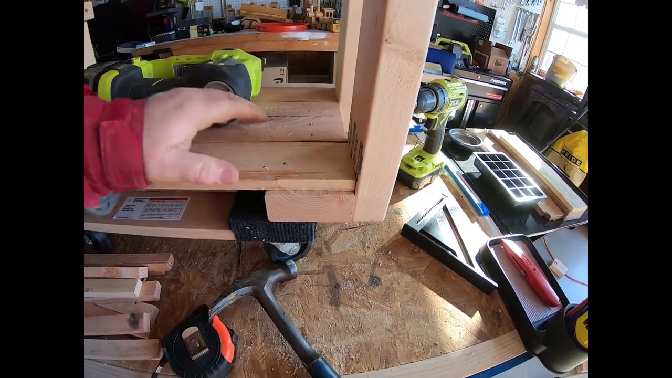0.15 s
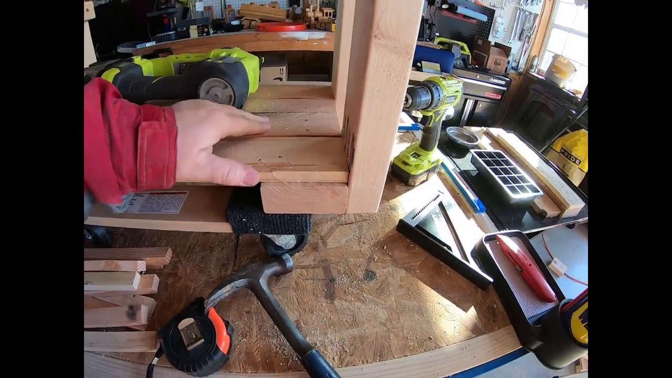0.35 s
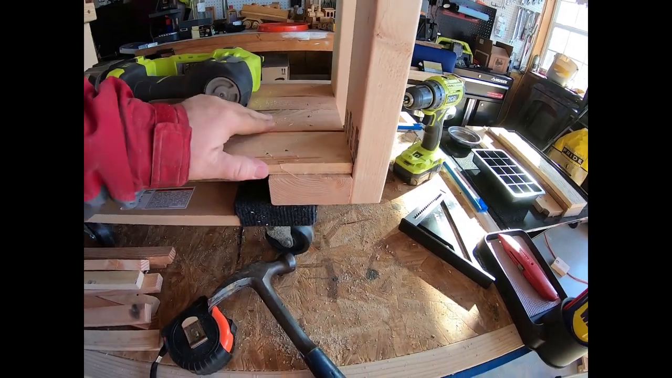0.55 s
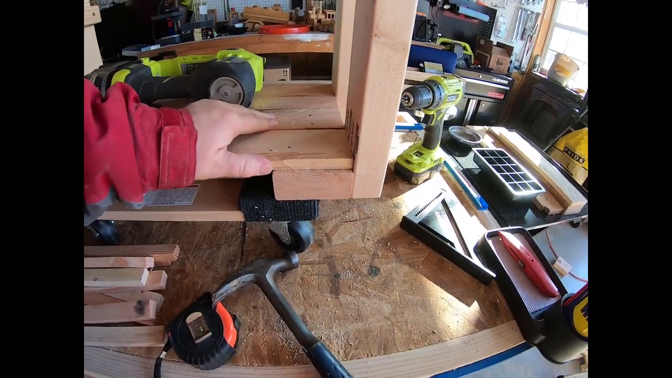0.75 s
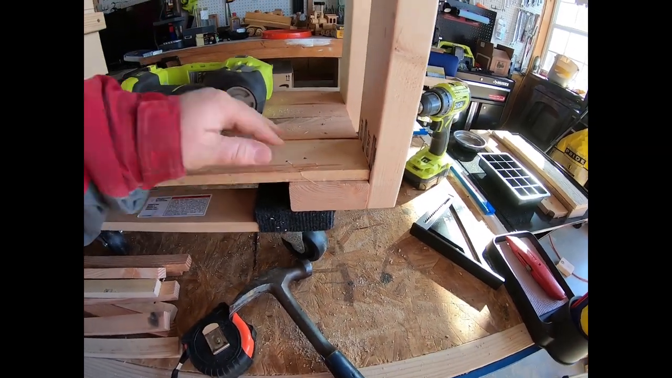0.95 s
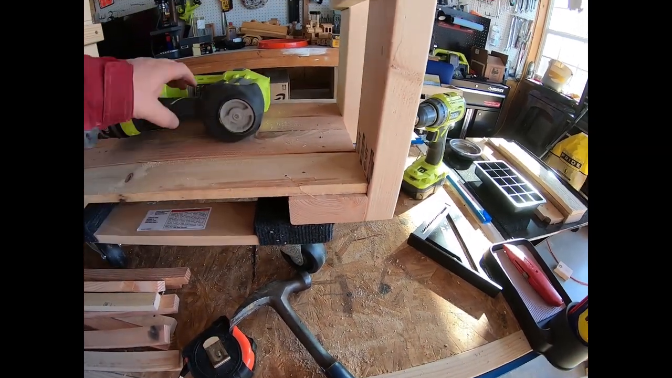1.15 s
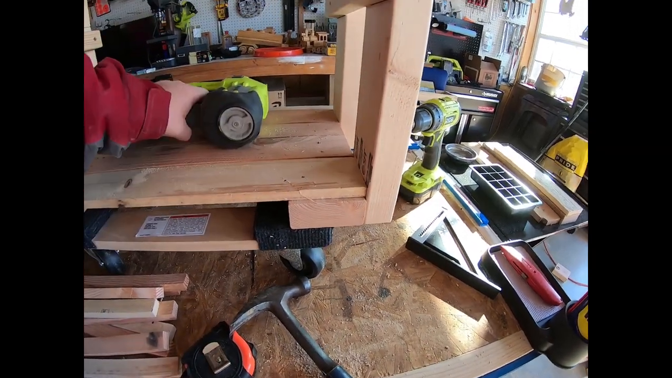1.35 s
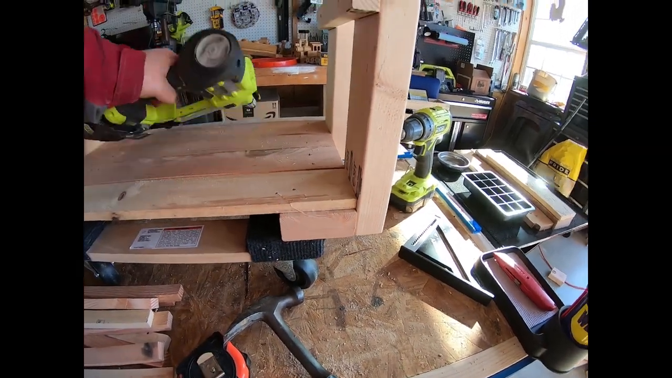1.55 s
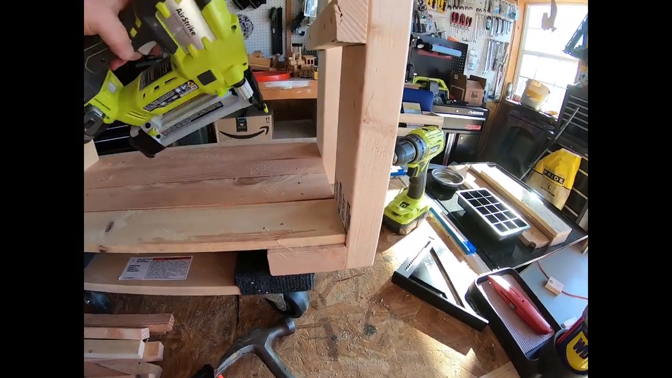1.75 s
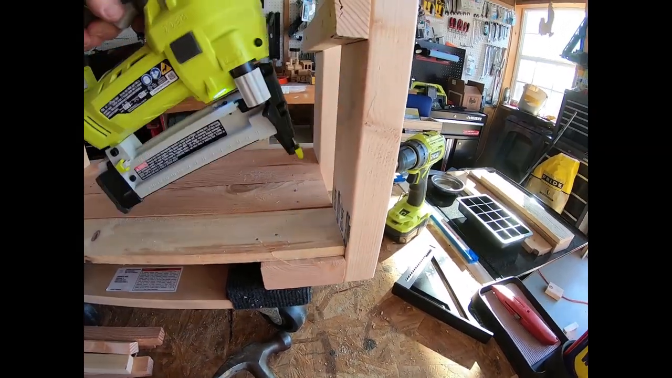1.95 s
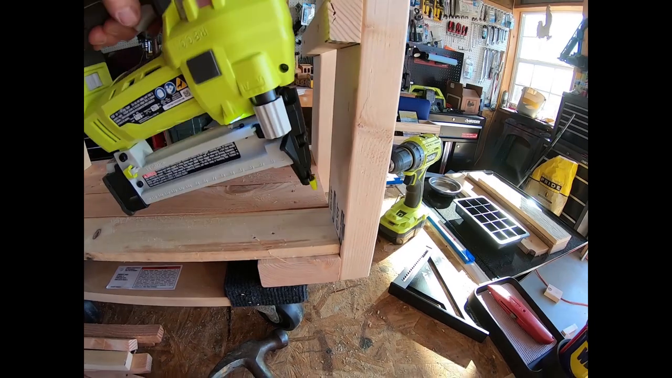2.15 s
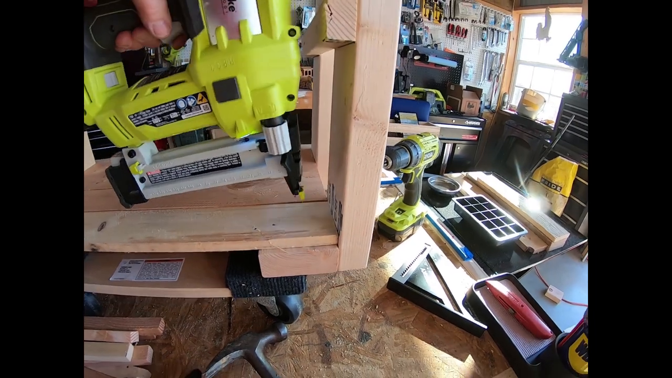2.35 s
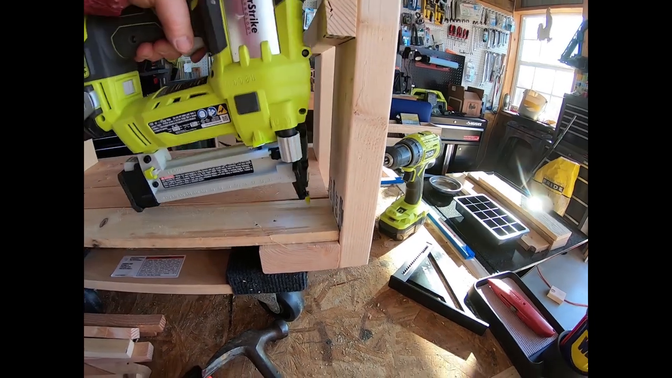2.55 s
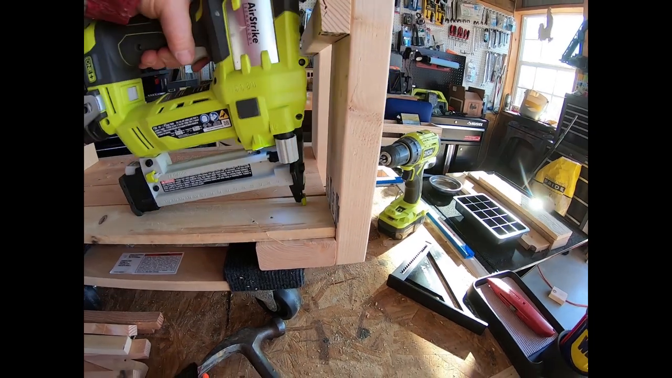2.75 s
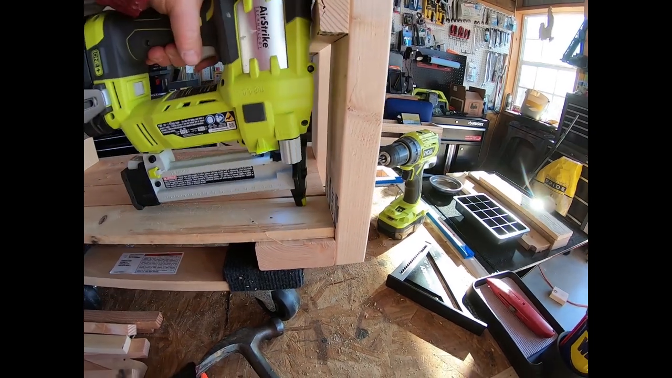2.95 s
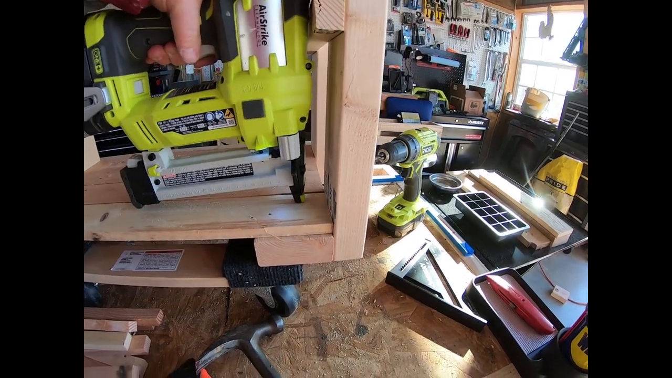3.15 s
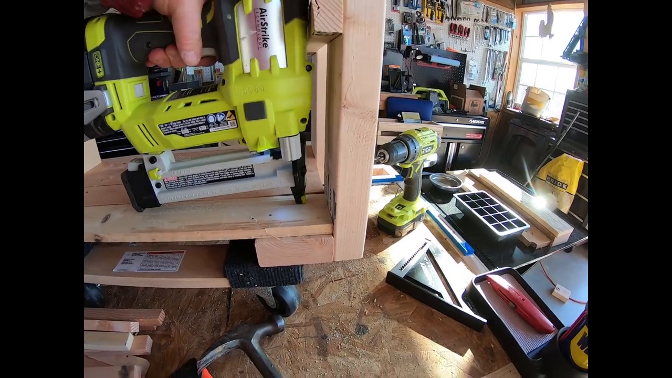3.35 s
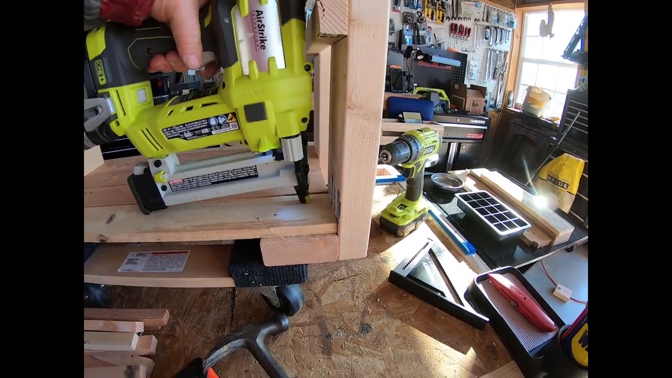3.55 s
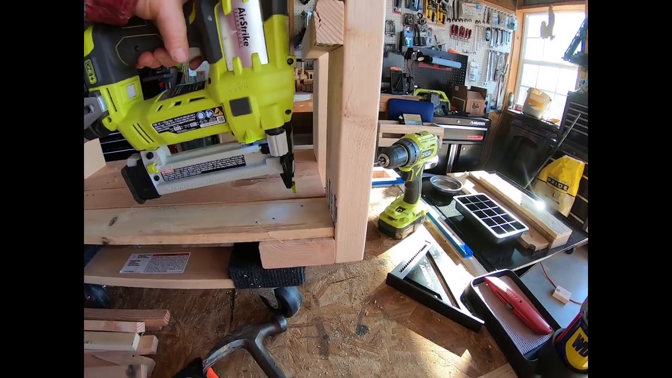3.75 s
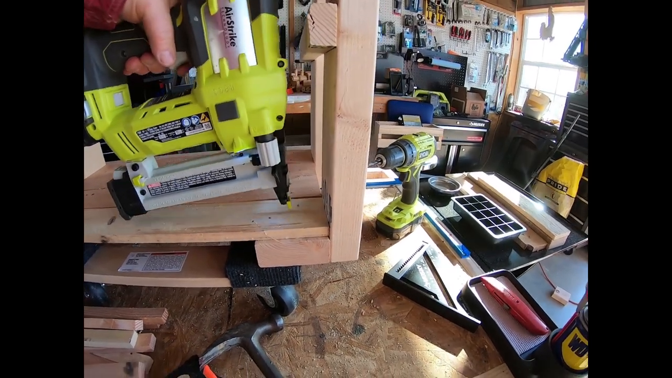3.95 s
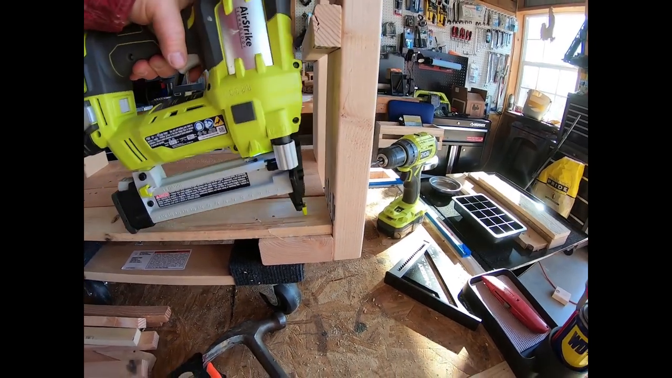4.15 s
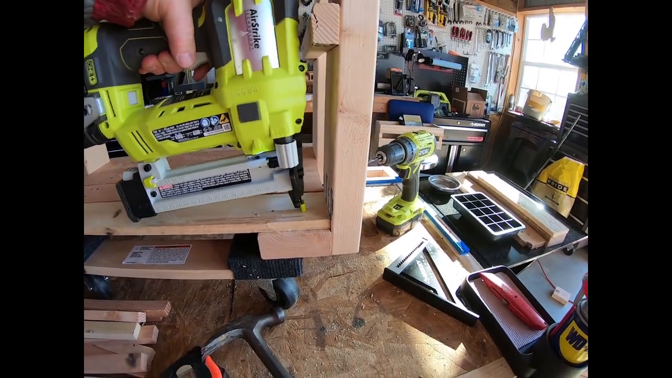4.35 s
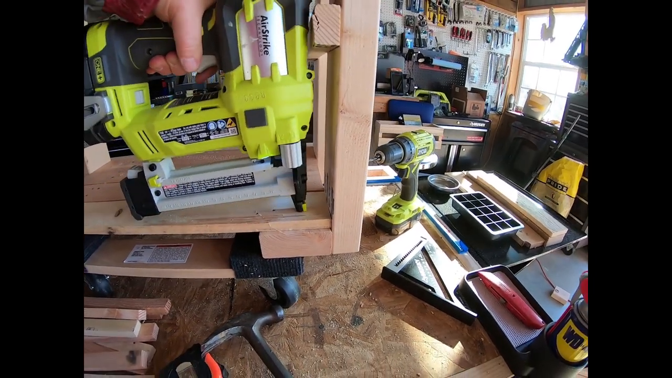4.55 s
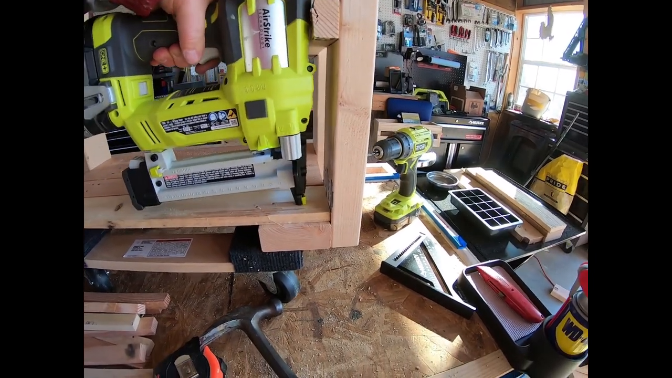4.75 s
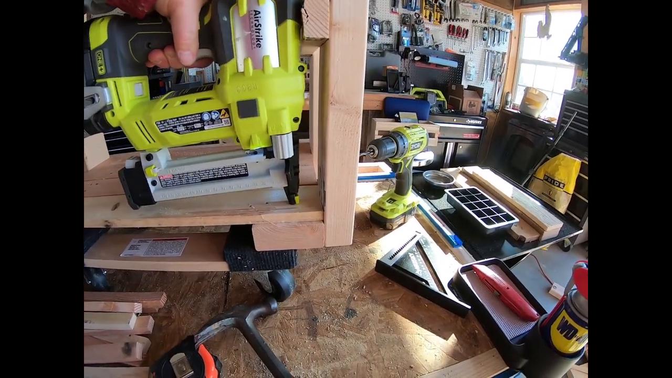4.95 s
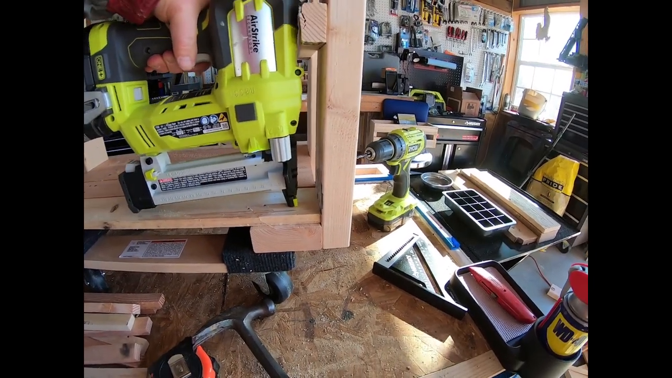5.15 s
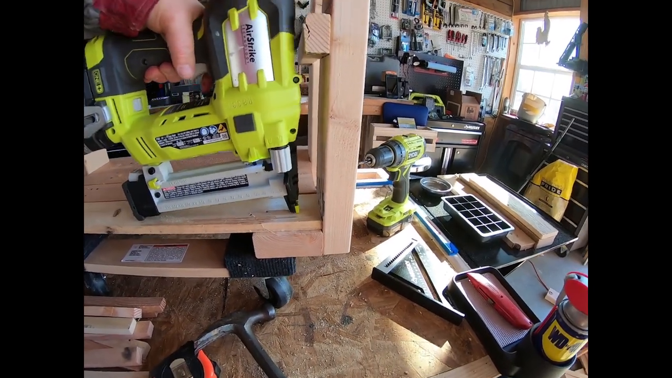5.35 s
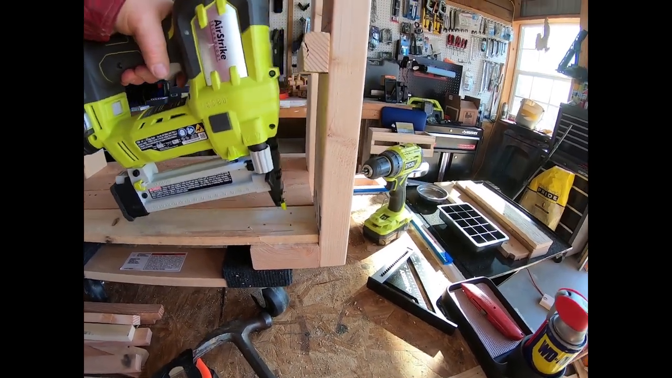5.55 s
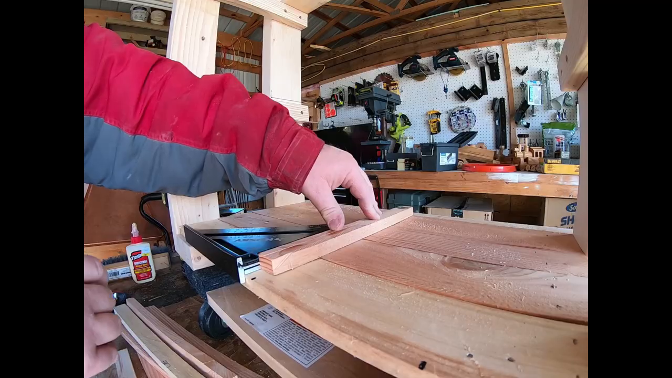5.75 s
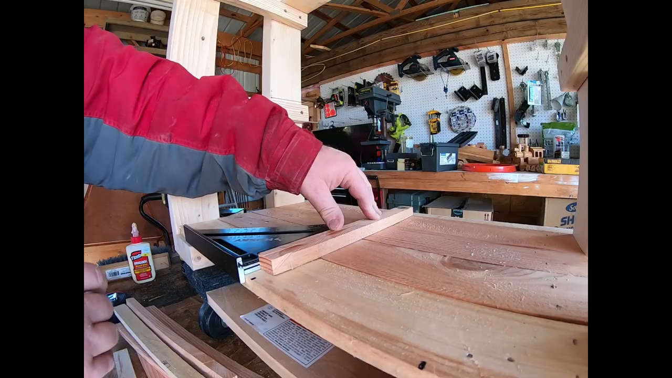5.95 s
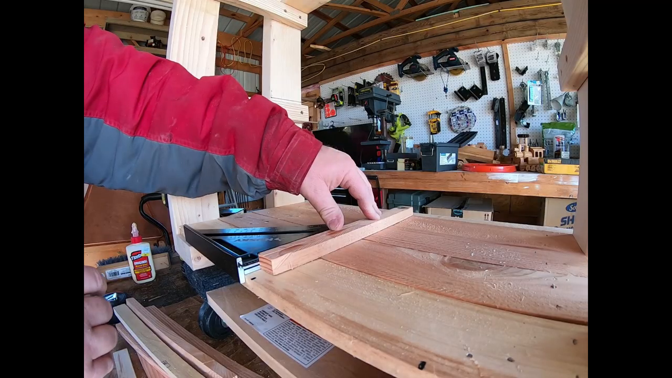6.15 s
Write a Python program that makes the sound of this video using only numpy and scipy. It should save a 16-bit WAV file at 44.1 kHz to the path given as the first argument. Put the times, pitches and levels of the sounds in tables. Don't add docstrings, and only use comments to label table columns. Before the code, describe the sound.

Close stereo pickup in a small workshop. Fingers tap and sleeves rub on softwood, then a tool clatters off a shelf. Its nose touches and is pressed onto the board with a deep knock. The trigger clicks, a geared motor whines up, sags and fires a hard crack with a woody boom; gears spin down to a latch click. It is set down again and fires once more, then a brief silence and faint room drone.

```python
import sys
import numpy as np
from scipy import signal
from scipy.fft import rfft, irfft, next_fast_len
from scipy.io import wavfile
from scipy.ndimage import uniform_filter1d

SR = 44100
rng = np.random.default_rng(int(sys.argv[2]) if len(sys.argv) > 2 else 0)


def to_wav(s):
    ch = np.atleast_2d(s).T
    pcm = np.round(np.clip(ch, -1, 1) * 32767)
    wavfile.write(sys.argv[1], SR, pcm.astype(np.int16))


def boost(x):
    u = np.asarray(x, float) / 20
    return 10 ** u


N = 277389

# (time [s], peak [dB]).
TRIGGER = ([(1700, -5.5, .008), (2930, -0.5, .006), (5800, -3, 0.0036), (6900, -2.5, 0.006),
            (8700, -7.5, 0.005)], 2.8, [(3.085, -21.5), (4.93, -24)])
DRIVER = ([(1640, -3, 0.0036), (2500, -3, 0.0048), (3580, 3.5, 0.0052), (5000, -5.5, 0.0028),
           (6540, -5.5, 0.0031), (9560, -6.5, 0.0028)], 3.2, [(3.3248, -1.1), (5.1645, -0.89)])
NAIL_SEAT = ([(950, -7, 0.0015), (1500, 0.5, 0.0023), (2600, 7, 0.0011), (4100, -3, .002)],
              3.7, [(3.329, -6.5), (5.1688, -3)])
REBOUND = ([(1987, 2.5, 0.023), (2900, -2.5, 0.011), (3422, -0.5, 0.019), (4080, -8, 0.011),
            (4735, 7.5, 0.0036), (5575, -16, 0.0044), (8160, -3.5, 0.0075)], 1.9, [(3.4252, -5),
            (5.2638, -5.5)])
LATCH = ([(1210, -13, 0.1), (2230, -6, 0.045), (2500, 3, 0.013), (3500, 2, 0.0042), (5480, -7, 0.0084),
          (4280, -6, 0.0084)], 2.45, [(3.68, -23), (5.479, -25)])
CRACK_LOW_HZ = [1500, 1100, 900, 1844, 1800]


def gun():
    out = np.zeros(N)
    parts = (TRIGGER, DRIVER, NAIL_SEAT, REBOUND, LATCH)
    for (modes, burst_ms, shots), low_hz in zip(parts, CRACK_LOW_HZ):
        for start_s, peak_db in shots:
            chatter, fall, t = burst(burst_ms, 1.6, rise_s=0.00025)
            strike = chatter * fall
            hit = np.zeros(len(t))
            for hz, mode_db, t60_s in modes:
                hit += boost(mode_db) * peak_one(ring(strike, hz, t60_s))
            hit += .9 * band(strike, low_hz, 6500)
            hit += .15 * band(strike, 6500, 14000)
            add_at(out, start_s, boost(peak_db) * peak_one(hit))
    return out


# (time [s], level [dB], pitch [Hz])
CHIP_TICK = (5.918, -56, 8300)


def blast():
    snap_db, shove_db, shove_hz = -16, -22.5, 39.8
    snap, shove = np.zeros((2, N))
    for shot_s, _ in DRIVER[2]:
        chatter, fall, t = burst(1.2, 2, rise_s=.0002)
        add_at(snap, shot_s, boost(snap_db) * band(chatter * fall, 9500, 19000) / 3)
        puff = np.sin(2 * np.pi * shove_hz * t) * np.exp(-t / 0.0088)
        add_at(shove, shot_s, boost(shove_db) * puff)
    tick_s, tick_db, tick_hz = CHIP_TICK
    click = np.zeros(N)
    click[round(tick_s * SR)] = boost(tick_db)
    left_right_db = [[3], [-3]]
    return snap + ring(click, tick_hz, 0.0069), shove * boost(left_right_db)


# (time [s], peak [dB], second group [dB], upper group [dB], push length [ms])
THUMPS = [(.002, -32, -2, -3, 2.8), (.06, -35, -1, -2.5, 5.3), (0.592, -48.5, 3.5, 8.5, 2.9),
          (0.627, -41, 16, -5, 4), (1.5559, -28.5, 6, 6, 2.7), (1.579, -33.5, 10, 13, 6.4),
          (1.598, -17.5, -22, -7, 4.5), (2.727, -36.5, -3.5, 1, 2.8), (2.81, -39, 6.5, -3, 6.6),
          (2.899, -10, -12, -23.5, 10.5), (3.324, -22, -5, -12, 3), (3.326, -10.5, -2.5, -22, 8),
          (3.381, -16.5, -21, -13, 8.7), (3.425, -22.5, -7, -5.5, 3), (3.511, -36.5, -2.5, -28, 6),
          (0.333, -55.5, 12, -13, 4), (0.351, -54.5, 8.5, -4, 5.6), (0.679, -40, -23, -24, 2),
          (3.615, -42, 1.5, -6, 4), (4.325, -44, -4.5, -10, 3.5), (4.514, -11.5, -12, -26, 8.1),
          (5.1624, -23, -4, -23, 3), (5.165, -12, -4.5, -10.5, 5.65), (5.221, -27.5, 0, -4, 19),
          (5.263, -17.5, -4, -2.5, 7.2), (5.429, -43.5, 1, -13, 2.9)]
# (pitch [Hz], level [dB], time to fall 60 dB [s])
BOARDS = [
    [(93, -24.5, 0.93), (130, 3.5, 0.33), (151, -11.5, .12), (179.3, -12, 0.38)],
    [(100, -1, 0.09), (251.4, -7.5, 0.49), (280, 1, 0.2), (305, -7, 0.23)],
    [(336, 7, 0.042), (401.6, -4, 0.096), (472, -11, 0.059), (650, -8, 0.072), (740, -6, 0.018),
     (860, -9.5, 0.0056)],
]


def boards():
    out = np.zeros(N)
    for k, group in enumerate(BOARDS):
        push = np.zeros(N)
        for start_s, peak_db, second_db, upper_db, push_ms in THUMPS:
            group_db = [2.0, second_db, upper_db][k]
            length_ms = np.clip(push_ms, 1, 8) / (k + 1)
            shape = np.hanning(round(length_ms * SR / 1000) + 2)
            add_at(push, start_s, -boost(peak_db + group_db) * shape / shape.sum())
        for hz, mode_db, t60_s in group:
            out += boost(mode_db) * ring(push, hz, t60_s)
    return out


# (time [s], gear mesh pitch [Hz])
SPEED = [
    [(3.113, 1150), (3.135, 2115), (3.155, 2620), (3.19, 3030), (3.225, 3190), (3.245, 3060), (3.275, 2600),
     (3.3, 1910), (3.324, 1640)],
    [(4.953, 1200), (4.965, 1800), (4.985, 2420), (5.02, 3000), (5.055, 3260), (5.08, 3140), (5.11, 2750),
     (5.14, 1970), (5.164, 1700)],
]
# (multiple of mesh pitch, top level [dB], load at the top [0-1], spread of load, floor [dB], line width [Hz])
GEAR_TONES = [(1, -28, .75, .6, -36, 60.0), (2, -33.5, .88, .45, -46, 170.0), (3, -36, .95, .2, -50, 140.0),
              (4, -43, .82, .07, -66, 120.0), (1.31, -31.5, .42, .22, -45, 50.0),
              (.86, -31, .4, .2, -42, 90.0), (1.07, -33, .38, .12, -44, 90.0),
              (1.2, -38, .35, .2, -50, 150.0), (.55, -32, .75, .35, -44, 60.0),
              (.69, -35, .58, .1, -48, 100.0), (1.65, -41, .4, .25, -50, 150.0),
              (.105, -32, .31, .05, -43, 15.0)]
# (pitch [Hz], level [dB])
TOOTH_COLOUR = [(120, -49.5), (200, -8), (334, -12), (456, -22), (821, -12.5), (1160, -14.5), (1680, -10),
                (3310, -7.5), (4520, -5), (5900, -5), (7200, -11), (10200, -17), (10900, -33.5),
                (14800, -36.5), (15600, -68)]


def motor():
    mesh_hz, = in_time(SPEED, silent=0)
    load, = in_time([[(rows[0][0], 0), (rows[-1][0], 1)] for rows in SPEED], silent=0)
    take_up, let_go = .035, .04
    running = np.clip(load / take_up, 0, 1) * np.clip(.35 + (1 - load) / let_go, 0, 1)
    turn = 2 * np.pi * np.cumsum(uniform_filter1d(mesh_hz, size=300)) / SR
    throb = 1 + .3 * np.sin(GEAR_TONES[-1][0] * turn)

    tones = np.zeros(N)
    on = mesh_hz > 0
    for multiple, top_db, at_load, spread, floor_db, width_hz in GEAR_TONES:
        swell = np.exp(-((load[on] - at_load) / spread) ** 2)
        tone_db = floor_db + (top_db - floor_db) * swell
        level = boost(tone_db + 3 + 3.5 * drift(width_hz)[on])
        tones[on] += level * np.sin(multiple * turn[on] + 1.0 * drift(width_hz)[on])
    tones = band(running * throb * tones, 110, 13000)

    halves = np.split(mesh_hz, [2 * N // 3])
    fastest_hz = np.concatenate([np.maximum.accumulate(half) for half in halves])
    teeth_at_hz, db_per_octave, sag_loss_db = 3100, 7.5, 2
    noise_db = -17 + db_per_octave * np.log2((fastest_hz + 1) / teeth_at_hz)
    noise_db -= sag_loss_db * np.log2((fastest_hz + 1) / (mesh_hz + 1))
    teeth = boost(-4.0) * coloured(TOOTH_COLOUR, 500, 10000)
    bright = band(teeth, 6500, 17000) * (fastest_hz / teeth_at_hz) ** 0.78
    teeth = band(teeth, 100, 6500) + bright
    return tones + running * boost(noise_db) * throb * housed(teeth, .3)


# (time after the shot [s], level [dB])
COAST = [
    (0.011, -44.5),
    (0.086, -39.5),
    (0.199, -41.5),
    (.38, -61),
    (0.469, -94),
]
# (pitch [Hz], level [dB])
RUN_ON_COLOUR = [(240, -23.5), (400, 3), (742, -3), (1580, -6), (1960, 5), (2250, -1.5), (3260, 0.5),
                 (5430, -6), (6440, -9), (9760, -10.5), (11200, -31), (14400, -36), (16000, -72)]


def run_on():
    coasts = [[(shot_s + s, db) for s, db in COAST] for shot_s, _ in DRIVER[2]]
    coast_db, = in_time(coasts)
    return boost(coast_db + 1.5 * drift(40)) * housed(coloured(RUN_ON_COLOUR, 1000, 8000), .18)


# (pitch [Hz], level [dB], time to fall 60 dB [s])
HOUSING = [(1450, -8, 0.035), (1790, -6, 0.04), (2060, -6, 0.06), (2590, -2, 0.06), (2830, -4, .07),
           (3270, -1, 0.07), (3870, -2, 0.07), (4180, -6, 0.06), (5190, -11, 0.06)]


def housed(noise, share):
    rings = sum(boost(db) * ring(noise, hz, t60_s) for hz, db, t60_s in HOUSING)
    return noise + share * rms_one(rings)


# (time [s], peak [dB], centre pitch [Hz], length [ms])
TAPS = [(0.136, -40.5, 2600, 4.4), (0.153, -43, 1540, 7.5), (0.364, -42, 1460, 4.2), (0.58, -48, 1000, 7.8),
        (0.706, -38.5, 3040, 3.3), (0.95, -40, 2000, 2), (1.16, -39.5, 1630, 2), (1.334, -38, 3330, 6.2),
        (1.417, -42, 1330, 13), (1.475, -33.5, 1830, 2), (1.828, -47, 1490, 6.1), (1.961, -49, 2480, 3.5),
        (2.156, -45.5, 1380, 5), (2.803, -36, 2900, 4.6), (2.856, -35, 1460, 2.5), (3.006, -36.5, 1290, 10),
        (3.548, -42.5, 5500, 2), (3.652, -50.5, 3540, 2), (4.72, -42.5, 1410, 8.7), (4.915, -46, 1100, 3.4),
        (0.892, -41.5, 740, 9.5), (4.337, -43.5, 2500, 3.3), (4.377, -46, 3000, 3.5),
        (0.617, -40, 830, 2.7)]
# (time [s], peak [dB], centre pitch [Hz], length [ms])
CLATTER = [
    (1.553, -17, 950, 26),
    (1.559, -10.5, 2480, 5.9),
    (1.57, -33, 700, 6.4),
    (1.594, -27, 700, 4.3),
]
# (time [s], peak [dB], centre pitch [Hz], length [ms])
TOUCH = [
    (2.725, -22, 2600, 8.1),
    (2.74, -31, 1607, 4.6),
    (4.3224, -30.5, 2420, 7.8),
]
# (time [s], peak [dB], centre pitch [Hz], length [ms])
NOSE = [
    (2.8964, -14.5, 1500, 6),
    (2.906, -30, 1336, 3.5),
    (3.119, -18, 1420, 6),
    (4.5101, -15.5, 2300, 7),
    (4.536, -34.5, 1270, 6.3),
    (4.561, -37, 1604, 2),
    (4.9609, -20.5, 2645, 3.9),
]
# (level around 8 kHz [dB], afterclatter [dB], dull body tail [dB], first tick [dB])
KNOCK_KINDS = [
    (-15, -26, -24.5, -5),
    (1, -22, -8.5, -5),
    (-11, -20.5, -21.5, -5),
    (-21, -17.5, -12.5, -4),
]
# (pitch [Hz], level [dB], time to fall 60 dB [s])
KNOCK_RINGS = [
    [(1650, -15, 0.019)],
    [(412, -9, 0.11), (719, -15, 0.069), (2500, -11, 0.018)],
    [(630, -11, .06), (1530, -11, .03), (3588, -8, .03)],
    [(667, -9, 0.023), (1170, -9, 0.034), (2210, -9, 0.017)],
]


def knocks():
    out = np.zeros(N)
    kinds = zip((TAPS, CLATTER, TOUCH, NOSE), KNOCK_KINDS, KNOCK_RINGS)
    for events, (top_db, after_db, body_db, tick_db), modes in kinds:
        for start_s, peak_db, hz, length_ms in events:
            chatter, fall, t = burst(length_ms, 3, size=9000, rise_s=.0004)
            strike = chatter * fall
            hit = band(strike, hz / 2.0, hz * 1.2)
            hit += boost(top_db - 10.0) * band(strike, 7100, 9000)
            for low_hz, t60_s in [(1000, 0.34), (2500, 0.019), (5000, 0.03)]:
                clatter = band(chatter * boost(-60 * t / t60_s), low_hz, 2.7 * low_hz)
                hit += boost(after_db) * clatter * (hz / low_hz) ** 0.93
            hit += boost(body_db + 7.5) * band(chatter * boost(-60 * t / .35), 280, 1000)
            tick = band(chatter * np.exp(-t / 0.00026), 1200, 6300)
            hit = peak_one(hit) + boost(tick_db) * peak_one(tick)
            for mode_hz, mode_db, t60_s in modes:
                hit += boost(mode_db) * peak_one(ring(strike, mode_hz, t60_s))
            fade = np.hanning(2 * len(t))[len(t):]
            add_at(out, start_s, boost(peak_db) * hit * fade / np.max(np.abs(hit)))
    return band(out, 290, 11000)


# (time [s], level [dB])
BUSTLE = [(0, -55.5), (.5, -51.5), (1.1, -53.5), (1.9, -53), (2.25, -62), (2.7, -61), (3.08, -53.5),
          (3.75, -66), (3.93, -71), (4.3, -79.5), (4.45, -62), (4.87, -62), (5.5, -63.5), (5.71, -73.5),
          (5.9, -68), (6.05, -74), (6.12, -77.5), (6.29, -87)]
# (time [s], length [s], level [dB],
# brightness [dB])
STROKES = [(0, 0.018, -44.5, -3), (0.137, .05, -57, -16.5), (0.256, 0.11, -60.5, 4.5),
           (0.606, 0.083, -44.5, -8.5), (0.977, 0.047, -47.5, 7), (1.175, 0.03, -51, -3.5),
           (1.34, 0.035, -58, 9), (1.502, 0.11, -49, -7), (1.581, 0.056, -40, 3), (1.995, 0.024, -65.5, 21),
           (2.148, 0.053, -56, -13), (2.31, 0.043, -67, -25), (2.55, 0.1, -64, -21), (2.77, 0.11, -51, -10),
           (2.892, 0.021, -46, 0), (2.898, 0.041, -54, -12), (3.004, 0.024, -57, -26),
           (3.789, 0.041, -77.5, -0.5), (4.044, 0.076, -67, -4), (4.344, 0.045, -50, -10),
           (4.503, 0.028, -69, 18), (4.539, 0.063, -42, -15.5), (4.709, 0.12, -58, -11.5),
           (4.913, 0.051, -54.5, -18), (5.965, 0.055, -74, 6.5), (6.261, .05, -66.5, -14)]
# (pitch [Hz], level [dB])
RUSTLE_COLOUR = [(15, -38.5), (25, -5), (130, 5.5), (317, -12.5), (575, -22), (840, -19), (1190, -11),
                 (1840, -19.5), (2610, -25), (5140, -31.5), (5730, -27.5), (9570, -36.5), (11000, -51),
                 (14000, -55), (16000, -70)]


def handling():
    bustle_db, = in_time([BUSTLE])
    t = np.arange(0, N + 64, 64) / SR
    start_s, length_s, stroke_db, bright_db = np.transpose(STROKES)[:, :, None]
    rise_share = .35
    side_s = np.where(t < start_s, rise_share * length_s, length_s)
    swell = np.exp(-((t - start_s) / side_s) ** 2)
    tints_db = (2.5 - 0.48 * bright_db, 0, -11.5 + bright_db)
    steady_db = [-50 + 0.5 * (bustle_db + 56.5), bustle_db, -70.5 + 1.2 * (bustle_db + 52.0)]
    levels_db = []
    for tint_db, still_db in zip(tints_db, steady_db):
        power = np.sum(swell * boost(2 * (stroke_db + tint_db)), axis=0)
        power = np.interp(np.arange(N) / SR, t, power)
        levels_db.append(10 * np.log10(power + boost(2 * still_db)))
    low_db, mid_db, high_db = levels_db
    low_db = np.minimum(low_db, -41)
    low = coloured(RUSTLE_COLOUR, 60, 350)
    mid = coloured(RUSTLE_COLOUR, 220, 3800)
    high = coloured(RUSTLE_COLOUR, 6900, 10000)
    upper_low_db = low_db + 0.8 * np.minimum(mid_db + 54.5, 3.0)
    parts = [(low, low_db, 12, 90), (low, low_db, 90, 240), (low, upper_low_db, 240, 420),
             (mid, mid_db, 420, 1200), (mid, mid_db, 1200, 3200),
             (high, high_db, 3200, 6000), (high, high_db, 6000, 16000)]
    flicker_db = 3 * np.exp(np.minimum(mid_db + 49, 0) / 18.5)
    together = drift(24)
    rub = np.zeros(N)
    for noise, part_db, low_hz, high_hz in parts:
        waver_db = flicker_db * (.5 * together + drift(38))
        rub += boost(part_db + waver_db) * band(noise, low_hz, high_hz)
    return rub + drone(mid_db)


# (pitch [Hz], width [Hz], level [dB])
DRONE = [(720, 140, -1.5), (2000, 390, 2.5), (2830, 720, -3), (3560, 62, -1), (4700, 100, -9.5),
         (8050, 49, -16), (9500, 96, -22.5)]


def drone(rub_db):
    white = rng.standard_normal(N)
    bands = sum(boost(db) * band(white, hz - width / 2, hz + width / 2) for hz, width, db in DRONE)
    return boost(-65.5 + 0.43 * (np.minimum(rub_db, -60) + 48)) * rms_one(bands)


def workshop(x):
    t60_s, wall_hz = 0.67, 4917
    t = np.arange(round(t60_s * SR)) / SR
    tail = rng.standard_normal((2, len(t))) * boost(-60 * t / t60_s) * np.minimum(t / 0.004, 1)
    tail = band(tail, 250, wall_hz)
    tail /= np.sqrt(np.sum(tail ** 2) / 2)
    return signal.fftconvolve(x[None], tail, axes=1)[:, :N]


# (pitch [Hz], likeness [0-1])
LIKENESS = [(30, .8), (80, .997), (330, .997), (600, .7), (2500, .85), (5000, .7), (10000, .55)]
# (pitch [Hz], level [dB])
LEFT_DB = [(30, 4), (70, .6), (200, .5), (350, 1.5), (700, 3.5), (1400, 7), (2800, 4), (5600, 2),
           (10000, 1.2)]
# (pitch [Hz], phase [rad])
LEAD = [(60, .1), (200, .07), (400, 0), (2500, .4), (5000, 1.0), (8000, 2.0), (14000, 1.8)]


def ports(x, scatter_s):
    size = next_fast_len(N + 8192)
    hz = np.fft.rfftfreq(size, 1 / SR)
    scatter = rng.standard_normal(8000) * np.exp(-np.arange(8000) / SR / scatter_s)
    scatter /= np.sqrt(np.sum(scatter ** 2))
    unlike = np.sqrt(1 - at_hz(LIKENESS, hz)) * .85 * rfft(scatter, size)
    tilt = boost(at_hz(LEFT_DB, hz) / 2) * np.exp(.5j * at_hz(LEAD, hz))
    left_right = np.array([tilt * (1 + unlike), (1 - unlike) / tilt])
    return irfft(rfft(x, size) * left_right, size)[:, :N]


def burst(ms, edge, size=6000, rise_s=0.00082):
    t = np.arange(size) / SR
    chatter = rng.standard_normal(size) * boost(1.5 * rng.standard_normal(size))
    fall = np.exp(-(t / np.clip(ms, .5, 20) * 1000) ** edge)
    return chatter * np.minimum(t / rise_s, 1), fall, t


def ring(x, hz, t60_s):
    r, w = boost(-60 / (t60_s * SR)), 2 * np.pi * hz / SR
    return signal.lfilter([0, np.sin(w)], [1, -2 * r * np.cos(w), r * r], x + 1e-18)


def band(x, low_hz, high_hz):
    edges_hz = [low_hz, min(high_hz, .45 * SR)]
    return signal.sosfilt(signal.butter(2, edges_hz, "band", fs=SR, output="sos"), x)


def coloured(spectrum, low_hz, high_hz):
    hz = np.fft.rfftfreq(N, 1 / SR)
    shape = boost(at_hz(spectrum, hz))
    power = np.sum(shape[(hz > low_hz) & (hz < high_hz)] ** 2) / len(hz)
    return irfft(rfft(rng.standard_normal(N)) * shape, N) / np.sqrt(power)


def drift(rate_hz):
    r = np.exp(-2 * np.pi * rate_hz * 16 / SR)
    slow = signal.lfilter([1], [1, -2 * r, r * r], rng.standard_normal(N // 16 + 2002))[2000:]
    return np.interp(np.arange(N) / 16, np.arange(len(slow)), rms_one(slow))


def in_time(tables, silent=-200):
    t = np.arange(N) / SR
    out = np.full((len(tables[0][0]) - 1, N), float(silent))
    for rows in tables:
        s, *columns = np.transpose(rows)
        inside = (t >= s[0]) & (t <= s[-1])
        out[:, inside] = [np.interp(t[inside], s, column) for column in columns]
    return out


def at_hz(points, hz):
    curve_hz, value = np.array(points)[:, :2].T
    return np.interp(np.log(hz + 1), np.log(curve_hz), value)


def rms_one(x):
    return x / np.sqrt(np.mean(x ** 2) + 1e-20)


def peak_one(x):
    return x / np.max(np.abs(x))


def add_at(out, start_s, x):
    i = round(start_s * SR)
    out[i:i + len(x)] += x


def scene():
    hits = band(knocks() + band(gun(), 800, 13000), 300, 11000)
    low = band(band(boards(), 84, 3000), 67, 5400)
    snap, shove = blast()
    near = ports(hits + low + snap, scatter_s=.008) + shove
    steady = ports(motor() + run_on() + handling(), scatter_s=.03)
    return near + steady + boost(-19) * workshop(hits)


def roll_off(x):
    return signal.sosfilt(signal.butter(12, 16460, fs=SR, output="sos"), x)


# (time [s], level [dB])
SCENE_CHANGE = [
    (0, 2),
    (5.706, 0),
    (5.712, -89.5),
    (5.79, -91.5),
    (5.796, -18),
    (5.85, 5),
    (6.29, 4),
]


def record(dry):
    top_cut = signal.sosfilt(signal.butter(6, 15900, fs=SR, output="sos"), dry)
    fade_db, = in_time([SCENE_CHANGE], silent=0)
    mix = boost(fade_db) * np.clip(top_cut, -.95, .95)
    return roll_off(mix)


dry = scene()
out = record(dry)
to_wav(out)
```